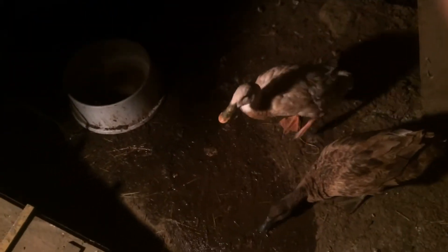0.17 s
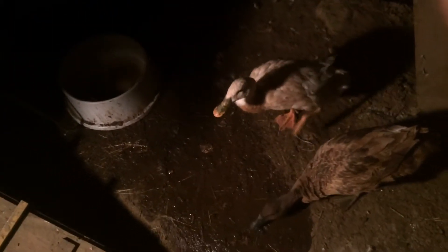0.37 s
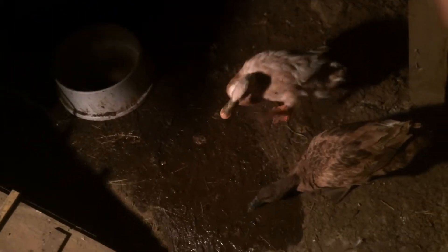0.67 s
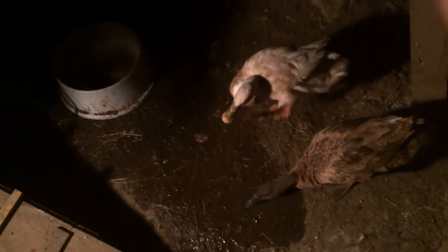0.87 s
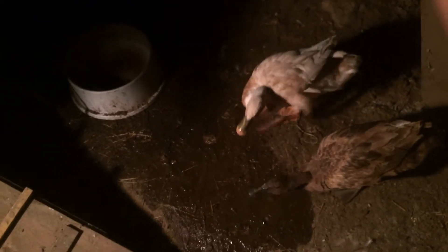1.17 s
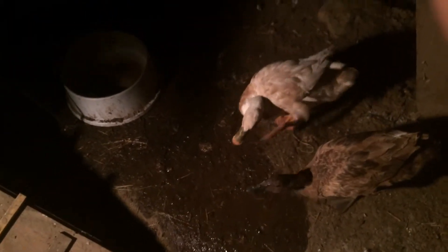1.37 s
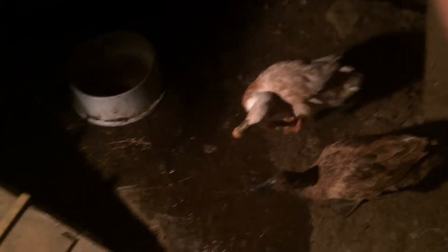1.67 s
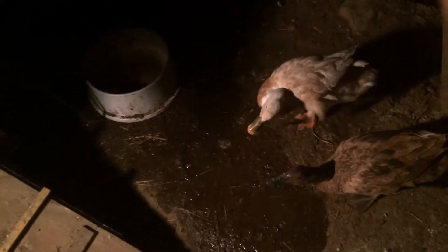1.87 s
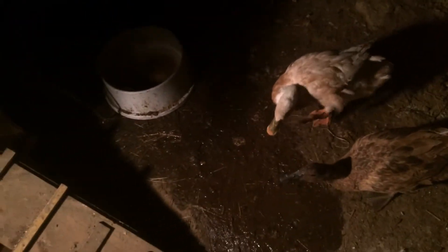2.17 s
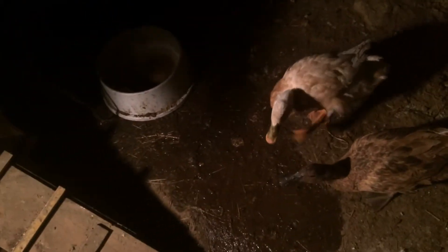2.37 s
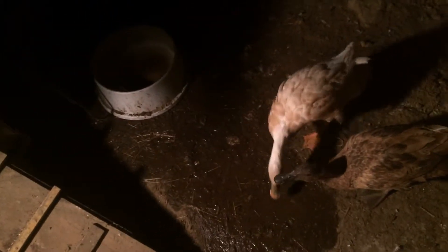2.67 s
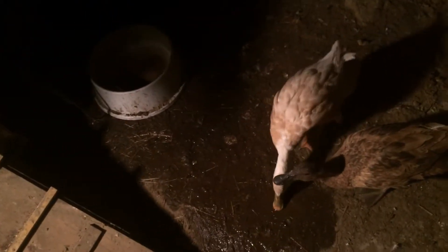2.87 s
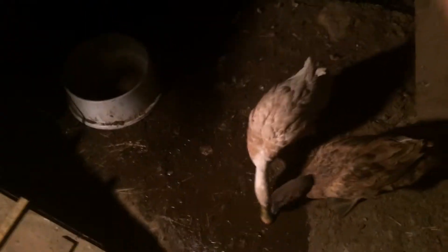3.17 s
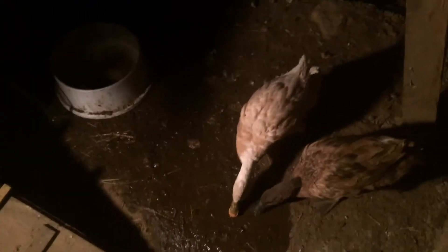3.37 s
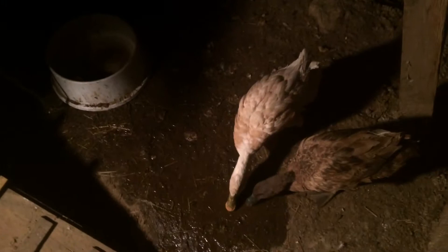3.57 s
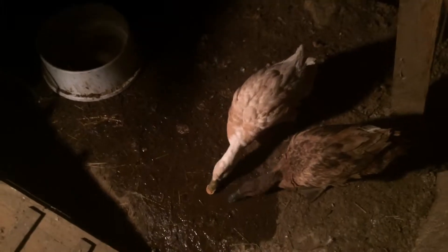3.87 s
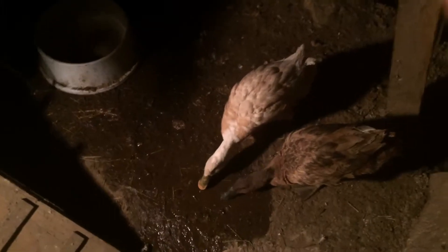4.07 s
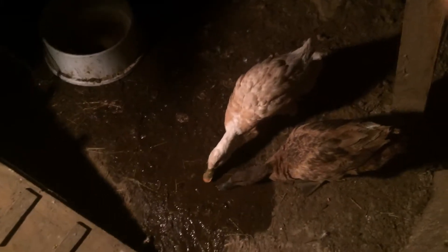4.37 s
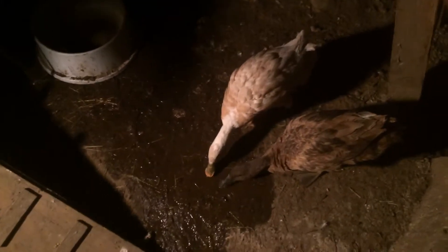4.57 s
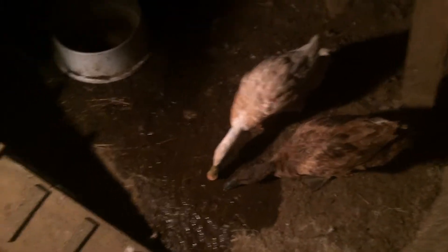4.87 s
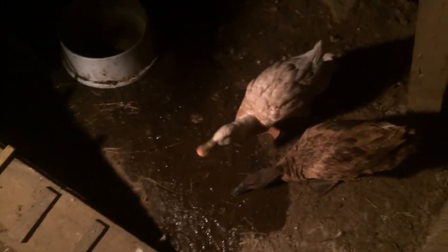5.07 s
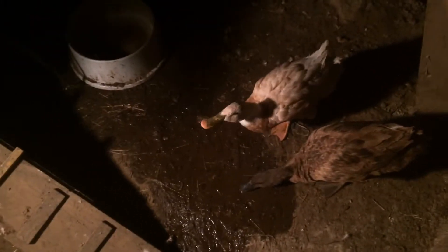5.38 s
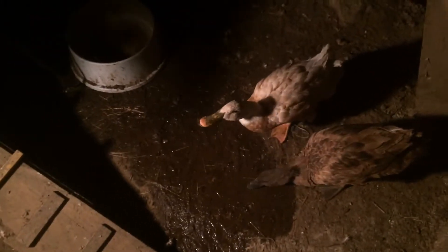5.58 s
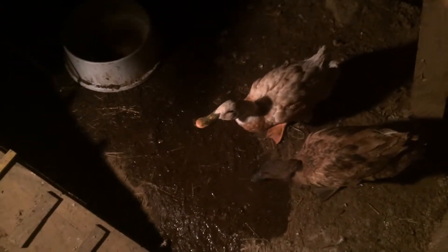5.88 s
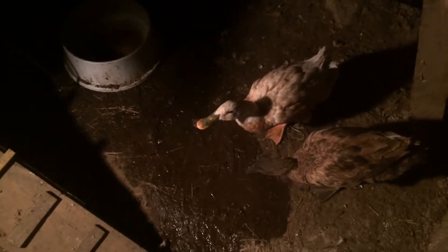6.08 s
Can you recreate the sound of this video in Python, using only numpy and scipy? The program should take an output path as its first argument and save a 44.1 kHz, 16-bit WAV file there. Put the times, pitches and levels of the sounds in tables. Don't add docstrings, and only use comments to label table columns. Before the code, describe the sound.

Close, dry recording of ducks feeding in shallow water: crisp bill snaps, small hollow pops, hissing spray and crackling droplets. A brief busy bout gives way to quiet nibbling, two dull wet footfalls and a gentle, wavering piping call. A longer, louder and faster guzzling bout follows before only scattered drips remain. Faint traffic rumble and microphone hiss lie beneath.

```python
import sys
import numpy as np
from scipy import signal
from scipy.fft import rfft, irfft, next_fast_len
from scipy.io import wavfile
from scipy.ndimage import uniform_filter1d, map_coordinates

SR = 44100
rng = np.random.default_rng(int(sys.argv[2]) if len(sys.argv) > 2 else 0)


def decibels_to_gain(level_db):
    exponent = np.asarray(level_db, float) / 20
    return 10 ** exponent


def dump_mix(stems):
    frames = np.atleast_2d(stems).T
    limited = np.clip(frames, -1, 1)
    pcm = np.round(limited * 32767).astype(np.int16)
    wavfile.write(sys.argv[1], SR, pcm)


N = 275170

# start_s, peak_db, pitch_hz, length_ms
DABBLE_SNAPS = [(0.004, -44, 2070, 4.6), (0.077, -48.5, 2000, 2.6), (0.1452, -42.5, 1700, 1.3),
                (0.26, -40.5, 2000, 1.35), (0.377, -37, 2380, 1.3), (0.4583, -39.5, 1930, 1.26),
                (0.5356, -30, 2810, 1.46), (0.624, -27, 2170, 1.12), (0.746, -28, 1970, 3),
                (0.783, -34.5, 1030, 1.7), (0.795, -25, 2420, 2.1), (0.8231, -35, 1850, 1.4),
                (0.881, -45, 1350, 3.9), (0.9111, -24, 2340, 1.36), (0.9531, -42.5, 1290, 6.3),
                (0.965, -34, 1920, 1.04), (0.9981, -28.5, 2180, 1.7), (1.031, -37.5, 1230, 4.7),
                (1.0369, -30.5, 2700, 1.8), (1.078, -24.5, 2100, 0.92), (1.0938, -41, 2730, 4.2),
                (1.061, -40, 2000, 3.6), (1.13, -45, 2000, 3.5), (1.1637, -39, 2780, 1.1)]
# start_s, peak_db, pitch_hz, length_ms
NIBBLE_SNAPS = [(1.271, -49.5, 2280, 4.1), (1.48, -49, 2550, 5.1), (2.0279, -47.5, 2530, 2.5),
                (3.273, -41, 2590, 2.1), (3.3556, -47, 1990, 1.3), (3.44, -40.5, 2920, 0.85),
                (3.5081, -37.5, 2110, 0.98), (3.578, -40.5, 1890, 6.7), (3.5964, -35.5, 2160, 1.2),
                (3.668, -43, 1900, 1.54), (3.727, -44, 1840, 2.5), (3.801, -42, 1710, 1.7),
                (3.884, -42, 2020, 2.9), (3.969, -40.5, 2520, 3.4), (4.0407, -35.5, 2000, 2.24),
                (4.0486, -42.5, 2900, 4.7), (5.706, -41.5, 1980, 10.6), (5.739, -32, 1480, 0.45),
                (5.838, -36, 1880, 1.23), (6.001, -39.5, 2640, 4.5)]
# start_s, peak_db, pitch_hz, length_ms
SIEVE_SNAPS = [(4.1278, -25.5, 2510, 1.24), (4.1527, -28.5, 2260, 1.1), (4.187, -34, 2180, 2.2),
               (4.213, -37, 2440, 1.35), (4.22, -30, 2210, 1), (4.2609, -32, 2590, 2.1),
               (4.296, -28, 2130, 0.47), (4.3599, -29, 2280, 1.22), (4.361, -20, 2080, 1.29),
               (4.3738, -37.5, 1550, 6.4), (4.3922, -29.5, 2590, 2.5), (4.4591, -30.5, 2010, 1.8),
               (4.533, -34.5, 2660, 3.9), (4.5948, -28.5, 2030, 2.64), (4.6639, -28, 1810, 2.2),
               (4.7314, -32, 3230, 0.63), (4.788, -22.5, 1650, 1.38), (4.798, -35.5, 1780, 1.7),
               (4.817, -28.5, 1410, 4), (4.8258, -28.5, 1840, 1.9), (4.8582, -28.5, 2720, 0.96),
               (4.8864, -28, 1960, 0.88)]
# start_s, peak_db, pitch_hz, length_ms
GUZZLE_SNAPS = [(4.973, -34.5, 2530, 4.4), (5.0122, -21, 1820, 1.7), (5.0358, -31, 1600, 1.4),
                (5.0864, -27.5, 2300, 1.2), (5.091, -21, 2420, 0.81), (5.113, -27, 2040, 2.2),
                (5.1176, -27, 1210, 3.44), (5.1387, -29.5, 1220, 4.3), (5.1432, -24, 1960, 1.24),
                (5.1812, -28.5, 2780, 1.06), (5.2096, -32, 2130, 1.4), (5.2382, -40, 1860, 2.6),
                (5.256, -30, 1300, 0.81), (5.4276, -32, 2010, 2.3), (5.4322, -22, 2240, 0.71),
                (5.45, -39, 2220, 2.2), (5.482, -20.5, 1830, 0.94), (5.544, -31.5, 1880, 0.98),
                (5.5758, -42, 1830, 4.4), (5.5982, -23, 1365, 2.9), (5.608, -39, 1650, 6)]
# start_s, peak_db, pitch_hz
GULPS = [
    (1.589, -49, 2330),
    (1.814, -51.5, 2240),
    (1.955, -50, 2250),
    (2.105, -53, 2390),
    (2.507, -54.5, 2350),
    (2.876, -56, 3160),
    (2.876, -59, 2290),
    (3.064, -54.5, 2630),
    (3.288, -54, 3040),
    (5.569, -46, 2020),
]
# freq_hz, gain_db
SLOP_SPECTRUM = [(200, -43), (900, -21.5), (2300, -3.5), (3300, -41), (7000, -36)]
LEAD_S, LEAD_DB = 0.0048, -20
AFTER_S, AFTER_DB, AFTER_MS = 0.011, -27, 2.21
CHANCE_DB = 0.5
POCKET_WANDER = 15

# start_s, peak_db, pitch_hz, length_ms
SQUIRTS = [(0.077, -43.5, 6660, 1.86), (0.7212, -49, 4700, 2.8), (0.7863, -44.5, 5050, 1.4),
           (0.911, -36, 5800, 1.15), (0.965, -42, 5940, 1.3), (1.077, -42.5, 4460, 2.65),
           (1.141, -39.5, 5200, 1.3), (1.177, -42, 5950, 1.2), (1.2152, -47.5, 4500, 1.87),
           (1.883, -52.5, 4940, 2.1), (3.1392, -45, 4900, 1.25), (3.5549, -50, 6860, 0.53),
           (4.129, -27, 5600, 1.1), (4.1871, -37, 4800, 0.86), (4.227, -41.5, 7530, 1.6),
           (4.3626, -34.5, 3330, 1.4), (4.464, -48, 7200, 1.27), (4.531, -35.5, 5500, 1.6),
           (4.6629, -30.5, 6600, 0.76), (4.788, -27.5, 4160, 0.96), (4.9163, -47, 7300, 1.7),
           (5.0348, -28, 6800, 0.83), (5.1384, -34, 8800, 0.28), (5.1818, -35.5, 3840, 2.1),
           (5.2333, -37, 5200, 0.53), (5.3181, -35.5, 6500, 1.16), (5.377, -36, 5960, 0.88),
           (5.434, -39.5, 3820, 2.16), (5.4877, -32.5, 7200, 1.36), (5.544, -38, 5650, 3.1)]
# start_s, peak_db, pitch_hz
COMB_BUBBLES = [(1.0714, -49, 4500), (1.0847, -45, 4100), (2.25, -58, 3100), (2.39, -57.5, 3130),
                (3.0355, -62, 4460), (3.5964, -56, 4300), (3.7847, -56.5, 4300), (3.8826, -55, 4270),
                (3.9694, -48, 4040), (4.0509, -47.5, 4390), (4.2633, -44, 4680), (4.456, -50, 4270),
                (4.625, -52, 4240), (4.714, -49, 4480), (4.7949, -40.5, 4100), (4.8881, -45.5, 7000),
                (5.1442, -36.5, 3670), (5.4069, -49.5, 4760)]
# start_s, peak_db
MIST_PUFFS = [(0.38, -41), (0.4592, -41), (0.722, -43), (0.822, -41), (0.967, -48), (1.1765, -42),
              (1.2154, -42), (1.882, -38.5), (4.228, -39), (4.303, -43), (4.3978, -33.5), (4.4616, -40),
              (4.726, -35), (4.8905, -36), (4.971, -36.5), (5.035, -30), (4.825, -37.5), (5.138, -32),
              (5.181, -26), (5.2602, -34.5), (5.32, -37), (5.376, -36), (5.427, -33.5), (5.487, -20.5),
              (5.543, -38), (5.5843, -39), (5.863, -41), (5.999, -43)]
# freq_hz, gain_db
SPRAY_SPECTRUM = [(1000, -32), (2300, 0.5), (3800, -7), (5700, 5.5), (8500, 0), (15000, -26), (16500, -61)]
# freq_hz, gain_db
FIZZ_SPECTRUM = [(7000, -17.5), (9000, -7), (15500, -5.5), (17500, -15)]
COMB_BUBBLE_MS = 3.5
SQUIRT_DB, SQUIRT_HZ, SQUIRT_MS, PUFF_DB = -50, 5440, 1.5, -50.5
SPRAY_GROWS, USUAL_SNAP_DB = 0.5, -26.5

# time_s, mist_db
EAGERNESS = [(0, -65), (.7, -65), (1.1, -61.5), (1.3, -68.5), (2.7, -69.5), (3.3, -66), (3.55, -65),
             (3.85, -63), (4.1, -61.5), (5.1, -59), (5.6, -61.5), (6.24, -65.5)]
# start_s, peak_db, pitch_hz, length_ms
EARLY_DROPS = [(0.0323, -44, 6060, 2), (0.145, -53, 6270, 2.9), (0.1937, -52, 5770, 2),
               (0.2341, -55, 6200, 3.1), (0.3084, -51, 8200, 5.3), (0.3883, -57, 12200, 2.2),
               (0.4095, -56, 12170, 1.9), (0.5716, -50, 6060, 2.6), (0.8031, -48, 9960, 1.5),
               (0.8698, -57, 7980, 2.1), (1.0932, -47, 6140, 2.1), (1.5452, -52, 7040, 5.6),
               (1.5954, -56.5, 10120, 5.8), (1.6336, -54.5, 7880, 3.8), (1.7396, -58, 8010, 2.5),
               (1.9024, -57, 6560, 3.0), (2.0299, -53, 10930, 3.8), (2.1671, -60, 8020, 3.65),
               (2.3633, -54.5, 8830, 4.2), (2.4733, -46, 12480, 1.95), (2.6272, -60, 10860, 5.3),
               (2.6915, -55, 6070, 3.3), (2.7885, -55, 10940, 2.4), (2.8436, -55, 8190, 2.1),
               (2.8595, -55, 6030, 2.3), (3.0351, -53.5, 4820, 8.4), (3.0629, -59, 4680, 1.8)]
# start_s, peak_db, pitch_hz, length_ms
LATE_DROPS = [(3.1504, -52, 14640, 3.3), (3.1819, -55, 7530, 3.1), (3.224, -53.5, 4300, 4.8),
              (3.2816, -55, 5500, 2.1), (3.3594, -58, 14350, 6.5), (3.3896, -56, 6330, 1.8),
              (3.4401, -51, 5780, 3.3), (3.5154, -57, 5150, 2.5), (3.5245, -53, 4950, 2.6),
              (3.5846, -53, 4340, 6.6), (3.6765, -54, 5440, 2), (3.7409, -51, 5420, 2.1),
              (3.785, -54, 5470, 3.3), (3.7998, -54, 4220, 5.9), (3.8185, -51, 14240, 2.2),
              (3.8403, -48, 7000, 2), (4.0008, -48, 7200, 1.7), (4.0403, -50, 4770, 1.9),
              (4.1372, -44, 4600, 1.9), (4.1532, -39.5, 5230, 3.1), (4.22, -43, 4950, 2.4),
              (4.3344, -48, 6700, 2.3), (4.3746, -51, 4360, 3.2), (4.4561, -58, 4340, 2.2),
              (4.4992, -58, 12780, 2.1), (4.5134, -56, 5700, 2.6), (4.6149, -48, 5970, 1.1),
              (4.6257, -49, 4600, 3.7), (4.7737, -50, 5050, 3.7), (4.8584, -59, 3760, 3.2),
              (5.1179, -43, 6540, 3.1), (5.3321, -41.5, 8230, 2.4), (5.394, -43, 7880, 3.3),
              (5.5149, -42.5, 7890, 2.3), (5.6486, -51, 6110, 2.8), (5.6717, -50, 7060, 4.1),
              (5.7028, -56, 10100, 7.2), (5.7482, -54, 6060, 8.9), (5.9257, -55, 12880, 4.6),
              (6.194, -54, 5690, 2.0)]
# start_s, peak_db, pitch_hz, length_ms
DEEP_GLUGS = [(0.115, -51, 2100, 6.0), (0.2189, -48, 1550, 4.8), (0.2879, -48, 1820, 6.9),
              (0.4894, -49, 2380, 5.4), (0.9774, -39, 2300, 5.2), (1.2161, -51, 2120, 4.4),
              (1.4759, -56, 2500, 6.6), (1.8827, -52, 2400, 6.0), (2.1767, -53, 2140, 6.4),
              (2.4737, -50, 2260, 3.3), (2.6902, -55.5, 1690, 6.5), (3.3567, -60, 2020, 3.1),
              (3.7402, -45, 1870, 2.2), (3.7858, -47, 2600, 3), (3.9417, -44.5, 1970, 2.9),
              (3.9578, -46, 1790, 4), (4.0268, -48, 2100, 6), (4.5032, -43.5, 1750, 6.4),
              (4.6943, -38.5, 1460, 4.7), (4.8908, -29.5, 2050, 6.3), (5.8492, -45, 2200, 5.2),
              (5.9915, -46, 2300, 3.6), (6.1795, -49, 1990, 5.7), (6.2023, -51, 2730, 5.3)]
# start_s, peak_db, pitch_hz
SPATTER_DROPS = [(0.7872, -37, 2150), (0.8286, -45.5, 700), (0.9955, -50, 11000), (1.108, -41, 1970),
                 (1.12, -39, 1910), (1.1611, -43, 1390), (3.996, -48, 4730), (4.1029, -44, 2200),
                 (4.1942, -41, 5970), (4.2518, -42.5, 770), (4.291, -40, 1300), (4.3618, -34, 3440),
                 (4.395, -46, 13000), (4.4631, -40, 2200), (4.5374, -38, 1300), (4.538, -43, 4300),
                 (4.7263, -41, 1410), (4.731, -48, 14000), (4.9098, -42, 750), (4.9203, -45, 4200),
                 (5.0303, -37, 6450), (5.031, -34, 1900), (5.088, -32.5, 1300), (5.1236, -52, 1300),
                 (5.1595, -48, 13000), (5.1939, -40, 1300), (5.2546, -46.5, 4500), (5.3239, -39.5, 1980),
                 (5.4239, -42, 1900), (5.4274, -45, 800), (5.4399, -40, 2300), (5.5132, -47, 2400),
                 (5.5407, -46, 11000), (5.601, -31, 1900)]
# start_s, peak_db
SIEVE_STROKES = [(1.25, -54), (1.435, -54.5), (1.521, -54), (1.612, -55), (1.348, -53), (1.7, -53),
                 (1.79, -57), (2.17, -59), (2.9, -57), (2.322, -57), (1.972, -60), (2.065, -60),
                 (3.99, -56), (4.057, -48), (1.108, -49)]
# freq_hz, gain_db
GROUND_SPECTRUM = [(1200, -27), (2300, 13.5), (3600, 0), (5500, 6.5), (7700, 5), (8500, -5), (15000, 5),
                   (16500, -60)]
GURGLE_DB, GURGLE_GROWS = 6.5, 1.72
DROP_SPREAD, GLUG_SPREAD, DROP_SHORT = 0.22, 0.19, 0.7
STROKE_MS, STROKE_HZ, STROKE_SPREAD = 5.7, 8600, 1
HALO_DB = -6
SPATTER_MS, MIST_FIZZ_DB = 3.2, 4

THUMP_TIMES = [
    2.376,
    2.9225,
    2.9235,
    2.932,
    3.633,
]
# pitch_hz, peak_db, length_ms
THUMPS = [
    (189, -43.5, 10.1),
    (600, -34.5, 2.06),
    (271, -31.5, 2.4),
    (264, -33, 4.4),
    (640, -41, 2.6),
]
# start_s, peak_db, pitch_hz, length_ms
FOOT_SLAPS = [
    (2.3712, -30, 1340, 2.23),
    (2.385, -46, 1230, 13),
    (2.922, -25, 1240, 3.12),
    (2.929, -26, 1253, 3.28),
]

# time_s, pitch_hz, level_db
PEEP_NOTE = [(2.515, 668, -65), (2.53, 693, -53.5), (2.546, 844, -49.5), (2.56, 780, -55), (2.57, 680, -63),
             (2.582, 683, -67), (2.6, 640, -72)]
# time_s, pitch_hz, level_db
LEFT_NOTE = [(3.035, 945, -72), (3.05, 1030, -63), (3.06, 1067, -51.5), (3.075, 1140, -53.5),
             (3.092, 1060, -51), (3.108, 947, -69), (3.12, 898, -55), (3.15, 890, -61)]
# time_s, pitch_hz, level_db
RIGHT_NOTE = [(3.045, 1205, -69), (3.06, 1270, -57), (3.08, 1314, -55), (3.095, 1284, -55),
              (3.11, 1215, -55), (3.13, 1160, -61), (3.15, 1180, -72)]
# time_s, pitch_hz, level_db
COO_NOTE = [(3.136, 769, -75), (3.15, 715, -54.5), (3.18, 791, -43.5), (3.203, 730, -43.5),
            (3.225, 850, -49), (3.24, 677, -56.5), (3.258, 600, -67)]
# time_s, pitch_hz, level_db
LIFT_NOTE = [(3.252, 600, -59), (3.27, 674, -50), (3.285, 756, -45.5), (3.3, 910, -68), (3.315, 840, -74)]
# freq_hz, gain_db
BREATH_SPECTRUM = [(1500, -42), (2300, 1), (3100, -6), (4000, -25)]
BREATH_DB = -5
FLUTTER = 0.14

# freq_hz, rt60_s
COOP_DECAY = [(300, 0.098), (2000, 0.061), (8000, 0.053), (15000, 0.059)]
# freq_hz, gain_db
WALL_SPECTRUM = [(2500, 0.5), (12000, -0.5)]
# freq_hz, gain_db
HISS_SPECTRUM = [(18, -54), (30, -17), (86, 1.5), (158, -6), (467, -13.5), (2050, -20.5), (2400, -28.5),
                 (3760, -37.5), (5590, -36.5), (8310, -40), (14800, -37.5), (15800, -39), (16050, -53)]
# time_s, level_db
RUMBLE_SWELL = [(0, -63), (1.6, -50.5), (3.4, -56), (6.24, -51.5)]
# freq_hz, gain_db
RUMBLE_SPECTRUM = [(50, -2.5), (74, 2.5), (85, 5.0), (96, -1.5), (150, -42.0)]
# freq_hz, gain_db
MIC_RESPONSE = [(20, -48), (45, -0.5), (15850, -0.5), (16010, -12)]


def bills():
    s, db, hz, ms, a, b, c = snaps()
    lead = [s - LEAD_S * np.exp(0.272 * b), db + LEAD_DB + CHANCE_DB * c, hz * np.exp(0.05 * a), ms]
    after = [s + AFTER_S * np.exp(0.5 * a), db + AFTER_DB + CHANCE_DB * b,
             hz * np.exp(0.23 * c), AFTER_MS + 0 * s]
    s, db, hz, ms = np.hstack([[s, db, hz, ms], lead, after])
    pocket = rings(s, db - 0.8, hz, 0.813 * ms, climb=0.0028)
    crack = puffs(s, db + 2.5 - 0.67 * ms, 0.441 * ms)
    slop = puffs(s + 0.003034, db - 2.5 - 0.27 * ms, 2.6 * ms + 2.5)
    s, db, hz = np.transpose(GULPS)
    gulps = rings(s, db, hz, np.full(len(s), 8.0), climb=0.0037)
    return pocket + coloured(crack + slop, SLOP_SPECTRUM) + gulps


def spray():
    at, snap_db, _, _, a, b, c = snaps()
    extra_db = SPRAY_GROWS * (snap_db - USUAL_SNAP_DB)
    comb = np.vstack([np.transpose(COMB_BUBBLES), np.full(len(COMB_BUBBLES), COMB_BUBBLE_MS)])
    small = [at, extra_db + SQUIRT_DB + CHANCE_DB * a, SQUIRT_HZ * np.exp(0.132 * b), SQUIRT_MS + 0 * at]
    s, db, hz, ms = np.hstack([np.transpose(SQUIRTS), comb, small])
    bubbles = rings(s, db + 1.0, hz, 0.75 * ms, climb=0.00088, size=400)
    bubbles += bursts(np.transpose([s, db - 2.0, hz, 3.5 * ms]), 0.18)
    click = puffs(s, db - 3.5, 0.68 * ms, size=400) + puffs(s + 0.0017, db - 27.0, 4 * ms)
    s, db = np.hstack([np.transpose(MIST_PUFFS), [at, extra_db + PUFF_DB + CHANCE_DB * c]])
    fizz = puffs(s, db + 4.0, np.full(len(s), 1.1), size=400)
    return bubbles + coloured(click, SPRAY_SPECTRUM) + coloured(fizz, FIZZ_SPECTRUM)


def sips(count=1900):
    mist_db, = curves(EAGERNESS)
    mean_db = mist_db.mean()
    gurgle_db = mean_db + GURGLE_DB + GURGLE_GROWS * (mist_db - mean_db)
    s = rng.uniform(0, N / SR - 0.03, (2, count))
    size = rng.uniform(-1.63, 1, (2, count))
    low, high, length = rng.standard_normal((3, count))
    at = (s * SR).astype(int)

    gurgle = rings(s[0], gurgle_db[at[0]] + 0.5 + 6 * size[0], 1950 * np.exp(0.294 * low),
                   1.237 * np.exp(0.554 * length), climb=0.0018, size=400)
    drop_hz = np.minimum(6000 * np.exp(0.26 * high), 15500)
    drops = rings(s[1], mist_db[at[1]] + 2.0 + 6 * size[1], drop_hz,
                  0.45 * np.exp(0.35 * length), climb=0.0025, size=200)
    mist_s = s[0, ::11]
    mist = puffs(mist_s, mist_db[at[0, ::11]] - 1.5, 3.2 * np.exp(0.55 * length[:len(mist_s)]))
    patches_db = 5.5 * map_coordinates(rng.standard_normal(count), [np.arange(N) * 200 / SR])
    wash = decibels_to_gain(mist_db - 11.5 + patches_db) * rng.standard_normal(N)

    listed = list(EARLY_DROPS) + list(LATE_DROPS)
    halos = [(t, db + HALO_DB, STROKE_HZ, 1.4 * ms) for t, db, _, ms in listed]
    strokes = [(t, db, STROKE_HZ, STROKE_MS) for t, db in SIEVE_STROKES]
    spatters = [(*row, SPATTER_MS) for row in SPATTER_DROPS]
    splashes = bursts(listed, DROP_SPREAD)
    splashes += bursts(list(DEEP_GLUGS) + spatters, GLUG_SPREAD)
    splashes += bursts(halos + strokes, STROKE_SPREAD)

    hiss = coloured(mist, SPRAY_SPECTRUM) + coloured(wash, GROUND_SPECTRUM)
    hiss += coloured(decibels_to_gain(MIST_FIZZ_DB) * mist, FIZZ_SPECTRUM)
    return gurgle + drops + splashes + hiss


def feet():
    slap = rings(*np.transpose(FOOT_SLAPS), climb=0) + bursts(FOOT_SLAPS, 0.44)
    hz, db, ms = np.transpose(THUMPS)
    return slap + rings(np.array(THUMP_TIMES), db, hz, ms, climb=0, size=1800)


def piping():
    out = np.zeros(N)
    t = np.arange(N) / SR
    breath = decibels_to_gain(BREATH_DB) * unit(coloured(rng.standard_normal(N), BREATH_SPECTRUM))
    notes = ((PEEP_NOTE, -11), (LEFT_NOTE, -24), (COO_NOTE, -26), (LIFT_NOTE, -19), (RIGHT_NOTE, -30))
    for note, octave_db in notes:
        hz, db = curves(note)
        gate = np.clip(np.minimum(t - note[0][0], note[-1][0] - t) / 0.0056, 0, 1)
        gate *= 1 + FLUTTER * map_coordinates(rng.standard_normal(N // 100), [t * 150])
        phase = 2 * np.pi * np.cumsum(hz) / SR
        tone = np.sin(phase) + decibels_to_gain(octave_db) * (np.sin(2 * phase) + breath)
        tone += decibels_to_gain(octave_db - 11) * np.sin(3 * phase)
        out += np.sqrt(2) * gate * decibels_to_gain(db) * tone
    return out


def coop(x, count=21):
    out, hop = np.zeros(N + SR), N // count + 1
    for k in range(count):
        hz, t, z = signal.stft(rng.standard_normal(SR // 6), SR, nperseg=128)
        decay = decibels_to_gain(-60 * t / along(COOP_DECAY, hz)[:, None])
        tail = signal.istft(z * decay, SR, nperseg=128)[1]
        wet = signal.fftconvolve(x[k * hop:][:hop], tail / np.linalg.norm(tail))
        out[k * hop + 90:][:len(wet)] += wet
    return out[:N]


def night():
    hiss = unit(coloured(rng.standard_normal(N), HISS_SPECTRUM))
    rumble = unit(coloured(rng.standard_normal(N), RUMBLE_SPECTRUM))
    return decibels_to_gain(-60.5) * hiss + decibels_to_gain(curves(RUMBLE_SWELL)[0] - 9.0) * rumble


def snaps():
    rows = np.array(list(DABBLE_SNAPS) + list(NIBBLE_SNAPS) + list(SIEVE_SNAPS) + list(GUZZLE_SNAPS))
    return np.hstack([rows, rng.standard_normal((len(rows), 3))]).T


def rings(s, db, hz, ms, climb, size=900):
    start, t, shape = swells(s, db, ms, size)
    walk = np.cumsum(rng.standard_normal(shape.shape), axis=1)
    wander = uniform_filter1d(walk, size=31, axis=1) / np.sqrt(SR)
    phase = 2 * np.pi * hz[:, None] * t * (1 + climb * 1000 * t)
    return placed(start, shape * np.sin(phase + POCKET_WANDER * wander))


def puffs(s, db, ms, size=900):
    start, t, shape = swells(s, db, ms, size)
    return placed(start, shape * rng.standard_normal(shape.shape))


def bursts(rows, spread, size=700):
    s, db, hz, ms = np.transpose(rows)
    f = np.fft.rfftfreq(size, 1 / SR) + 1
    band = np.exp(-0.5 * (np.log(f / hz[:, None]) / spread) ** 2)
    hiss = irfft(rfft(rng.standard_normal((len(s), size))) * band, size)
    start, t, shape = swells(s, db - 4.5, DROP_SHORT * ms, size)
    return placed(start, shape * hiss / hiss.std(axis=1, keepdims=True))


def swells(s, db, ms, size):
    rise = np.clip(ms, 0.3, 20)[:, None] / 1000 / 2.2
    t = np.arange(size) / SR
    shape = (t / rise * np.exp(1 - t / rise)) ** 2
    return np.maximum(s - rise[:, 0], 0), t, decibels_to_gain(db)[:, None] * shape


def placed(s, shapes):
    at = np.round(s * SR).astype(int)[:, None] + np.arange(shapes.shape[1])
    return np.bincount(at.ravel(), shapes.ravel(), N + SR)[:N]


def along(points, hz):
    f, v = np.transpose(points)
    return np.interp(np.log(hz + 1), np.log(f + 1), v)


def curves(rows):
    s, *cols = np.transpose(rows)
    return [np.interp(np.arange(N) / SR, s, c) for c in cols]


def unit(x):
    return x / np.sqrt(np.mean(x ** 2) + 1e-20)


def coloured(x, spectrum):
    m = next_fast_len(N + 8192)
    return irfft(rfft(x, m) * decibels_to_gain(along(spectrum, np.fft.rfftfreq(m, 1 / SR))), m)[:N]


def scene():
    near = bills() + spray() + sips() + feet()
    voice = piping()
    to_walls = decibels_to_gain(-8.5) * coloured(near, WALL_SPECTRUM) + decibels_to_gain(-10.5) * voice
    return (near + voice + coop(to_walls) + night())[None]


def band_limit(x):
    return signal.sosfilt(signal.butter(12, 17160, fs=SR, output="sos"), x)


def record(dry):
    mix = coloured(dry[0], MIC_RESPONSE)[None]
    return band_limit(mix)


dry = scene()
out = record(dry)
dump_mix(out)
```